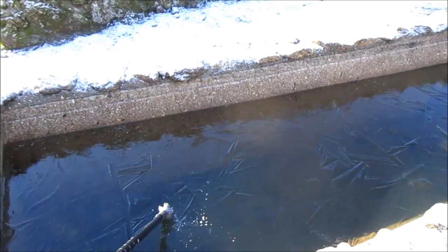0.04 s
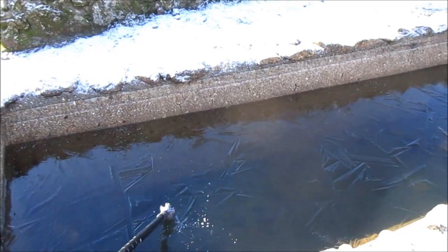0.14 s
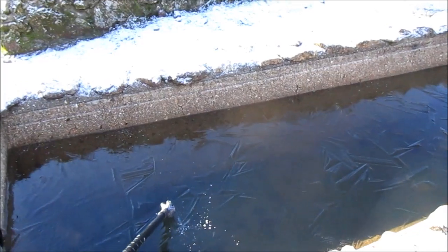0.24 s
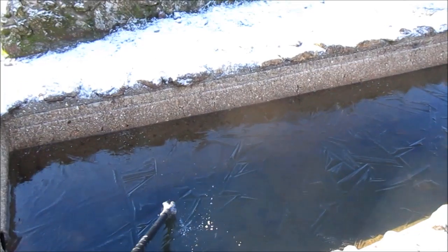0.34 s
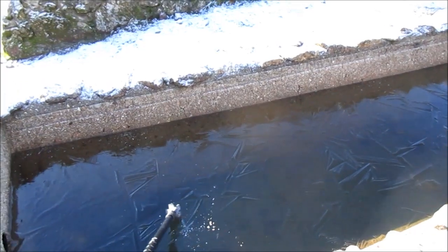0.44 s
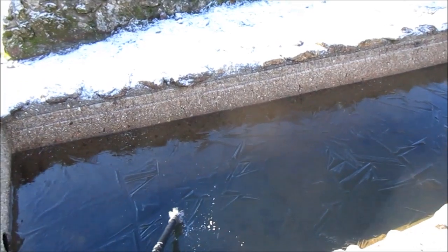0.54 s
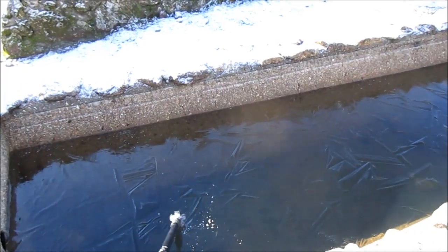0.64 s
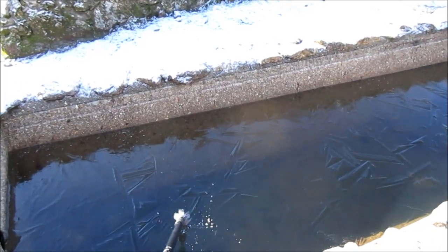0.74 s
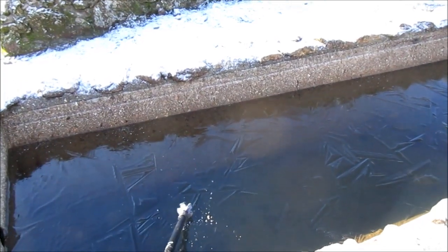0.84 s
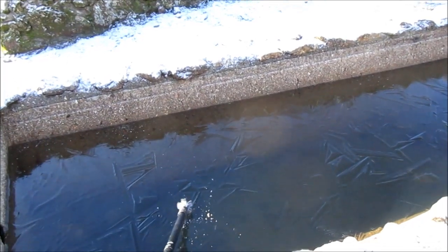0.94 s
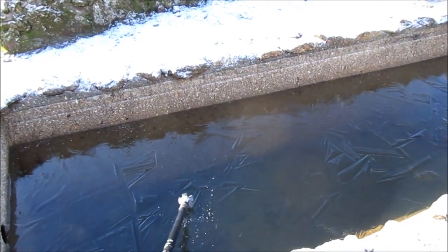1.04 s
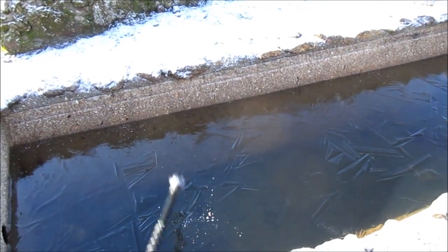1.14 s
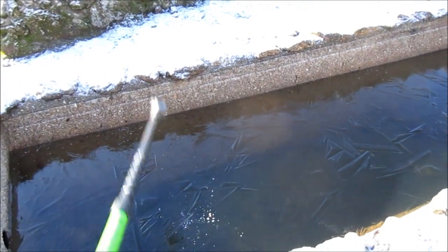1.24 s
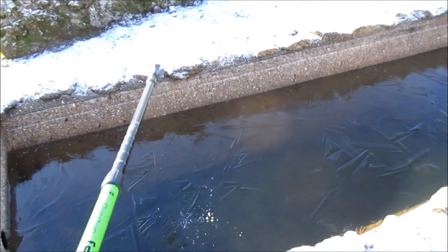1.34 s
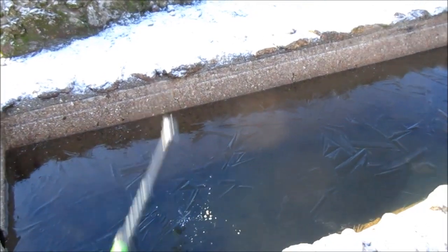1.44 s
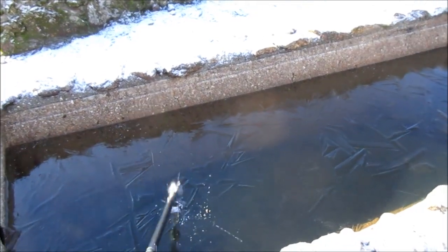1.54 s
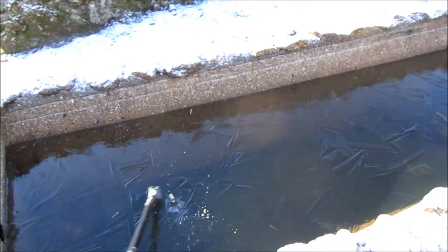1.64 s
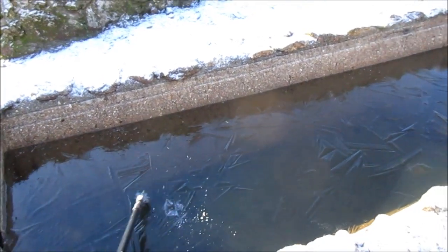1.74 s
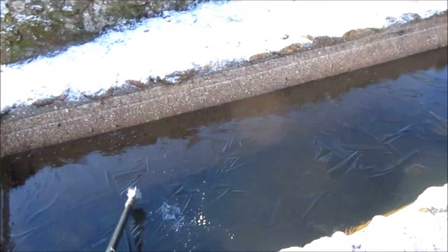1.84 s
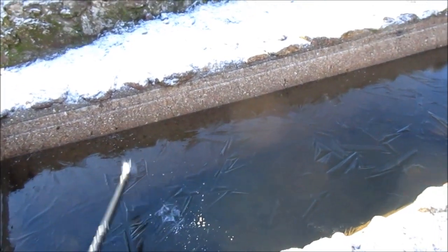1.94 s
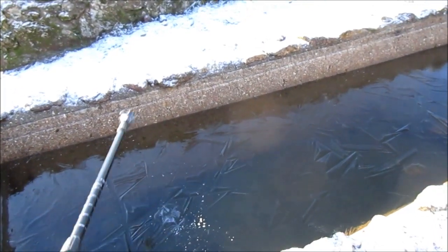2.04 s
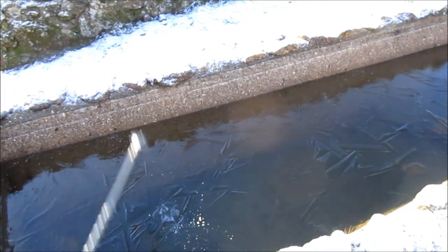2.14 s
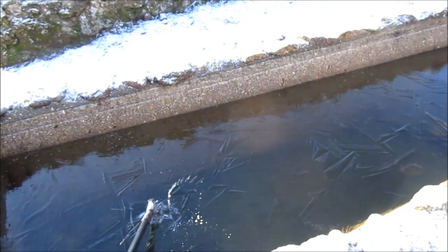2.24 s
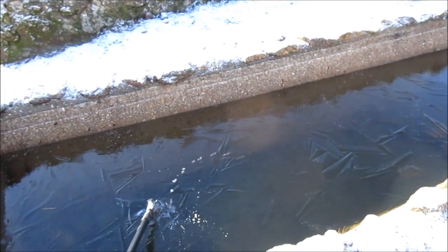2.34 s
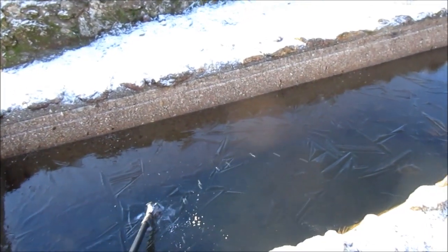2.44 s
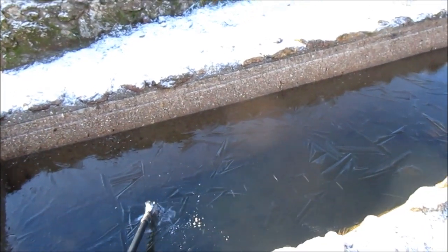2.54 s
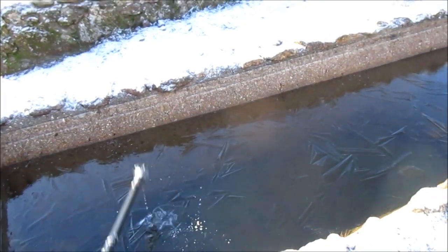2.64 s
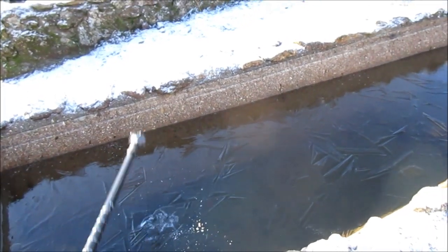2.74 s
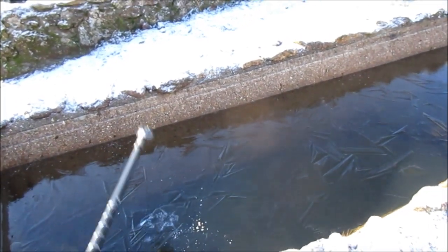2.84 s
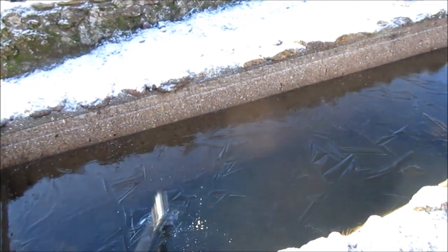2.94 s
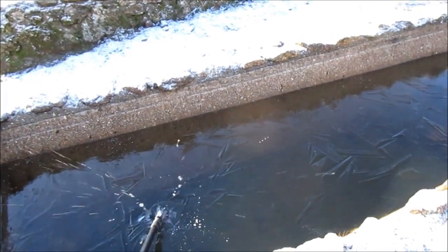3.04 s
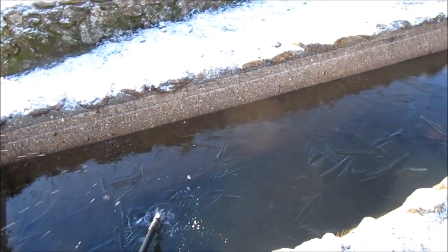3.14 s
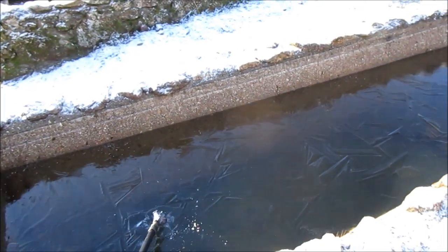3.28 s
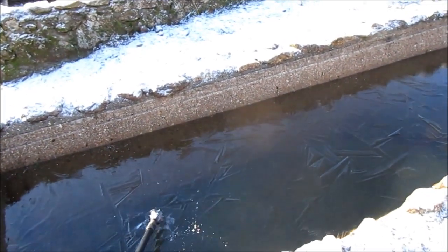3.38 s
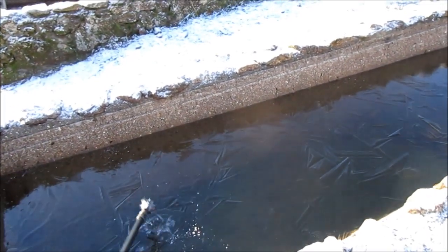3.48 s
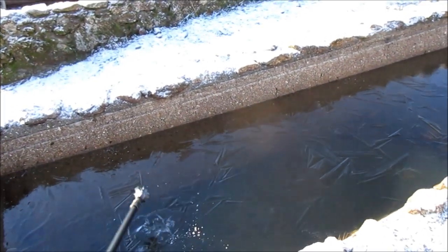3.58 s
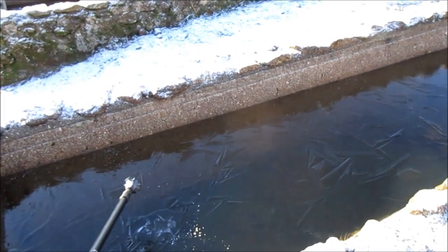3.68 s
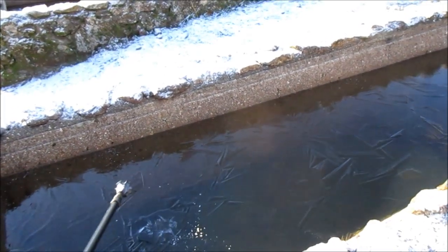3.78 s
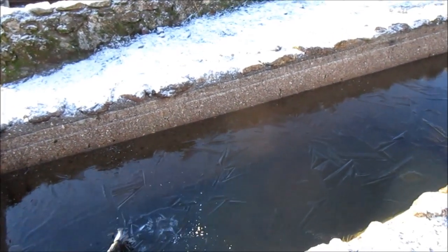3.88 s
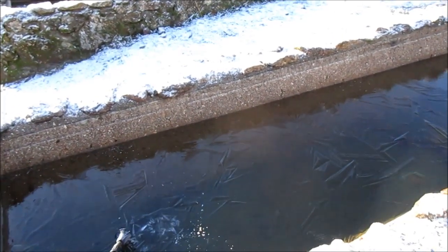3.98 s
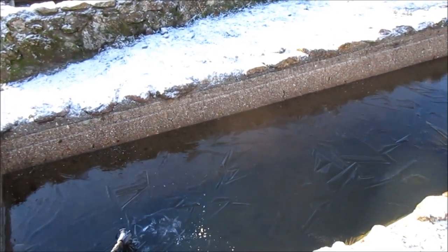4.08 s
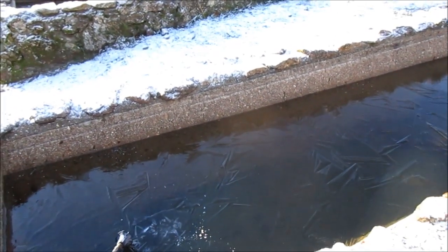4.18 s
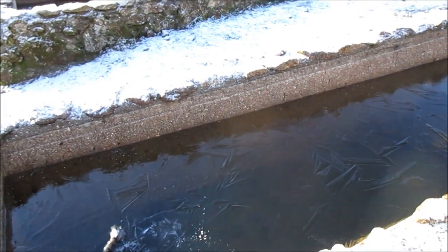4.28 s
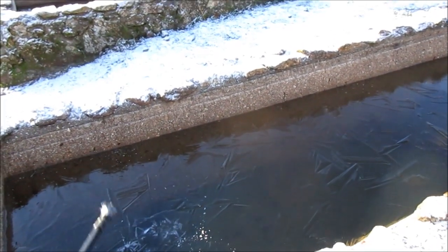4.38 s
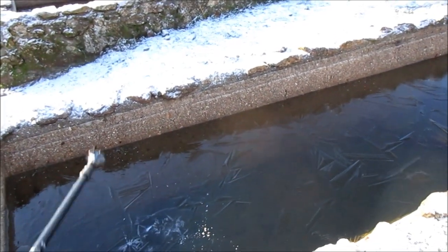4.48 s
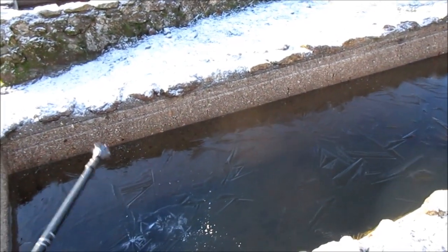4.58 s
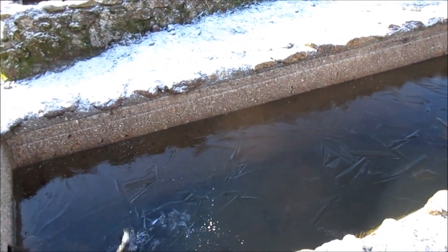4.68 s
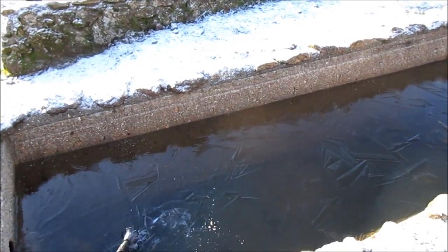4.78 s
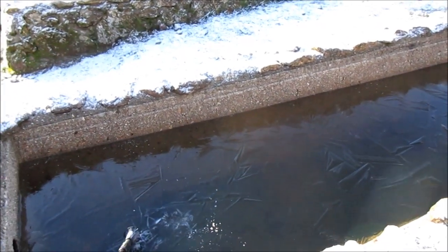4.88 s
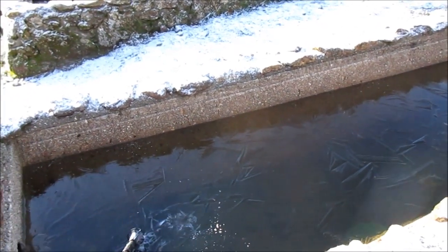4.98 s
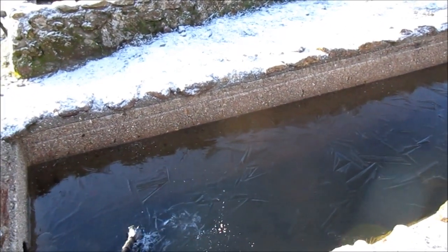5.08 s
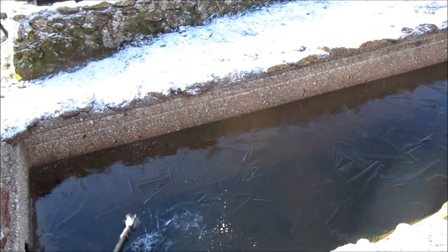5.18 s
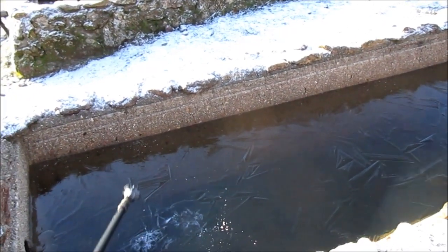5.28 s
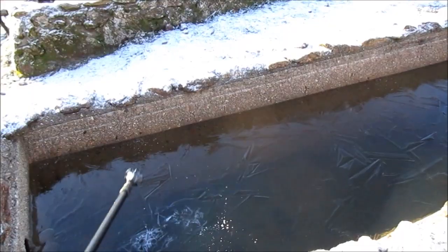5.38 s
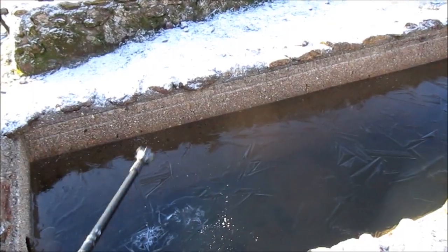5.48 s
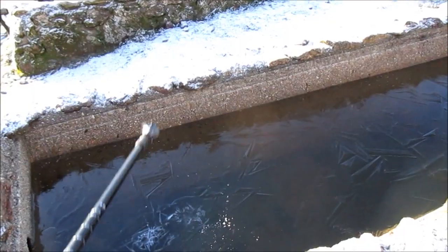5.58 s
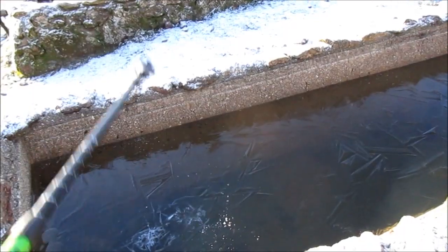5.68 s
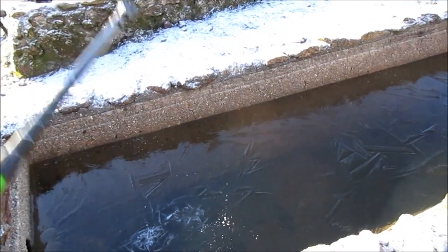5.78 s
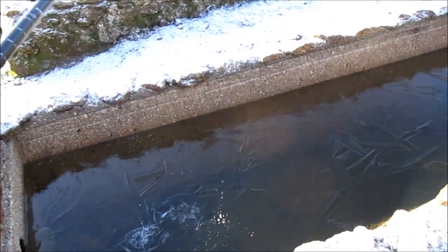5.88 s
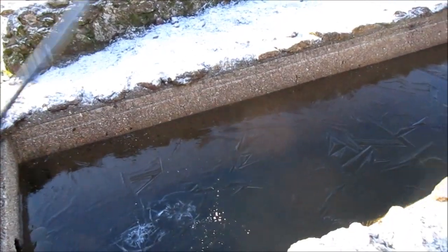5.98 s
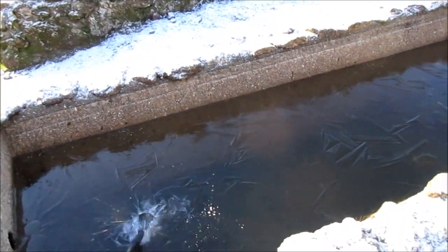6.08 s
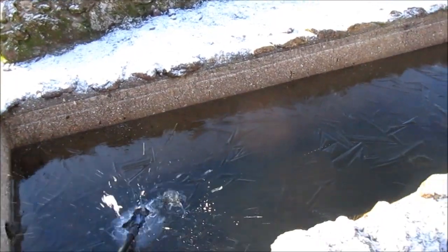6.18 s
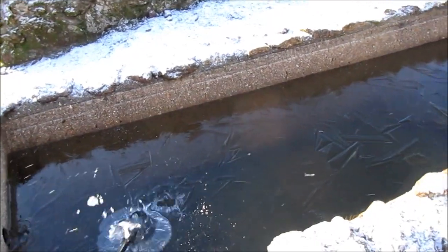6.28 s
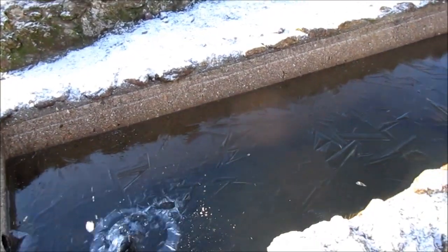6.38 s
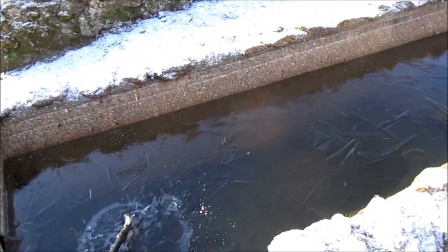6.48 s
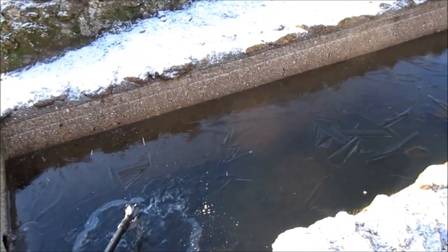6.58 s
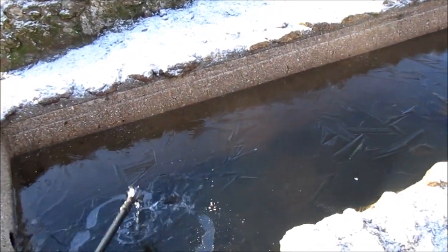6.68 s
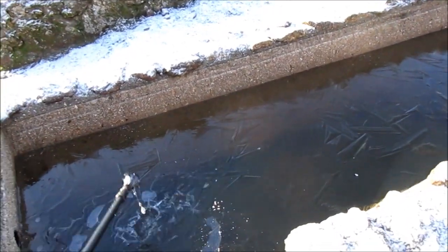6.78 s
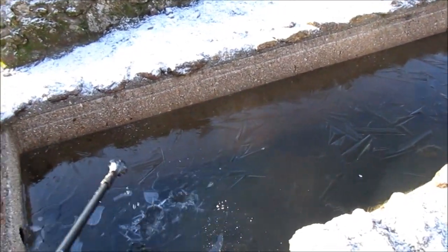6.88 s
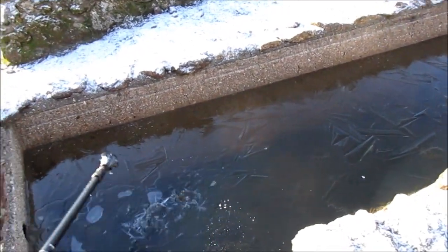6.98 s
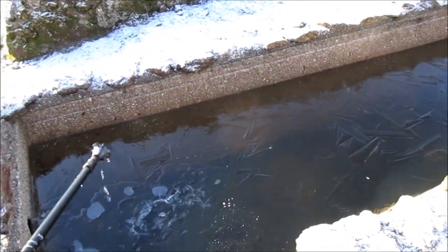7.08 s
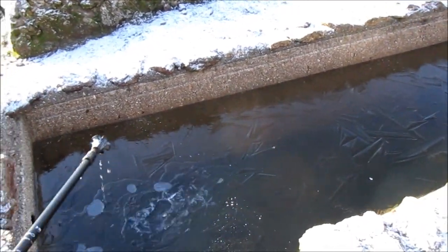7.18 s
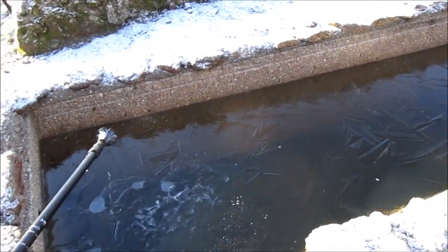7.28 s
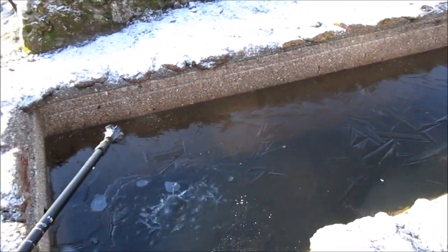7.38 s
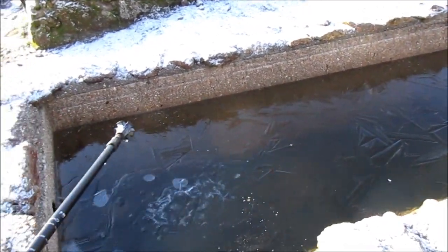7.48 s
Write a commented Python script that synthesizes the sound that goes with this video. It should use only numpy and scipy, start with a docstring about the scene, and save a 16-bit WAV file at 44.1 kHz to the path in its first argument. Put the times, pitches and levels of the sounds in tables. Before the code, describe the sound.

A quiet outdoor place, close mono microphone: light lumpy wind, distant hum, hiss, a very thin high whine and faint intermittent pips. The weak tail of an earlier jab fades at 0 s while clothing rustles, swelling near 1 s, with a few tiny ticks. At 1.5 s a pole tip hits thin ice: a sharp bright crack, short thud, flexing knock and brief hollow boom between walls. More jabs crack at 2.2, 3.0, 3.9 and 4.7 s, each instant and loud, followed by rattling, secondary snaps and sparse fading ticks. Barely audible rising bird notes come near 2.1, 2.9 and 5.3 s. After a quieter pause with slight cloth movement, the sixth jab at 6.1 s breaks through: a heavy crack, then dense splintering, tinkling shards, sloshing and short low glugs until about 7 s. Last isolated ticks and faint rustle fade by 7.5 s.

```python
"""Six sharp stabs of a pole tip crack thin ice on a walled water channel, until the sheet breaks through.
One more stab, just before the start, is still dying away. Each thuds, flexes and rattles the plate and
makes the channel boom: damped sines and shaped noise. Cracks and shard ticks are bursts of tiny clicks;
water gurgles through gliding tones and filtered noise. Clothing rustles at first; light wind, far hum,
a far bird, thin tones and microphone hiss lie below."""
import sys
import numpy as np
from scipy import signal
from scipy.fft import rfft, irfft, next_fast_len
from scipy.io import wavfile

SR = 44100
rng = np.random.default_rng(int(sys.argv[2]) if len(sys.argv) > 2 else 0)


def int16_out(signal):
    """Quantize to a 16-bit WAV file."""
    q = np.round(np.clip(np.atleast_2d(signal).T, -1, 1) * 32767)
    wavfile.write(sys.argv[1], SR, q.astype(np.int16))


N = 331632  # length of the scene in samples

# Stabs of the pole: (time [s], thud level [dB], thud pitch [Hz], flex level [dB], flex pitch [Hz],
# boom level [dB], boom tilt [dB per octave], rattle level [dB], crackle level [dB], rattle t60 [s])
# A t60 is the time a sound takes to fall by 60 dB.
STAB_EVENTS = [(0.0, -35, 380, -62, 950, -46, -4, -53.5, -51.5, 0.45),
               (1.5323, -19, 399, -2, 1137, -38.5, 1.3, -34, -36, 0.36),
               (2.2179, -14, 482, -7, 953, -34, -2.4, -29, -31, 0.3),
               (2.972, -16.5, 294, -24.5, 888, -37.5, -2, -33.5, -31.5, 0.35),
               (3.9164, -8.5, 346, -17, 900, -33.5, -1, -30, -29.5, 0.23),
               (4.712, -16, 344.6, -9, 1039, -36, -4, -33.5, -30.5, 0.32),
               (6.118, -13.5, 291, -9, 799, -35.5, 1.7, -27.5, -18, 0.24)]
# Resonances of air and ice between the walls: (pitch [Hz], level [dB], ring length [relative])
CHANNEL_MODES = [(142.4, -3.5, .7), (233.5, -1, .5), (274, -3, .55), (394, -10, 0.083), (447, -6, 0.61),
                 (539, -7.5, 0.67), (590, -14, 0.37)]
# Tone colour of snapping ice: (frequency [Hz], relative level [dB per Hz])
SNAP_COLOUR = [(3000, -28), (4500, -5.5), (6000, -3), (9000, -4), (11500, -10), (14000, -36.5)]
# Level of the far hum and hiss: (time [s], level [dB])
HUM_LEVEL = [(0, -62), (.33, -58.5), (1.5, -55.5), (1.8, -61), (5.0, -62), (5.2, -63), (5.9, -61.5),
             (6.4, -56), (7.0, -60), (7.52, -61)]


def stabs():
    """The tip thuds and the sheet flexes, as damped sines; the plate then rattles and crackles on."""
    # Duller colour of the sheet's lasting rattle: (frequency [Hz], relative level [dB per Hz])
    shudder_colour = [(400, -15.5), (800, -9), (1300, 1), (2200, -1.5), (3200, -13), (5000, -18)]
    crackle_share = 0.5  # crackle length against rattle length
    linger_db, linger_stretch = -16, 1.8  # a fainter, longer rattle and crackle follow each stab
    out, rattle, crackle = np.zeros((3, N))
    for s, thud_db, thud_hz, flex_db, flex_hz, _, _, rattle_db, crackle_db, t60 in STAB_EVENTS:
        add(out, s, swing(flex_db, flex_hz, 0.0105, 0.0008))
        add(out, s, -swing(thud_db, thud_hz, 0.016, 0.0002))
        add(rattle, s, dying(rattle_db, t60, 0.0099))
        add(rattle, s, dying(rattle_db + linger_db, linger_stretch * t60, 0.01))
        add(crackle, s, dying(crackle_db, crackle_share * t60, 0.0034))
        add(crackle, s, dying(crackle_db + linger_db, linger_stretch * t60, 0.0091))
    clumps = amp(3.5 * drift(60))  # cracks advance in fits
    plate_rattle = coloured(clumps * grit(3000, 1.5), shudder_colour)
    out += rattle * (0.55 * plate_rattle + 0.49 * chips(900, 700, 2800, 5.0))
    plate_crackle = coloured(clumps * grit(5000, 2.7), SNAP_COLOUR)
    out += crackle * (0.64 * plate_crackle + 0.41 * chips(1300, 3700, 13000, 6.6))
    return out


def channel_boom():
    """Each stab makes the channel modes boom: narrow noise that swells and dies."""
    boom_stretch = 3.1  # the boom lasts in step with the rattle
    out = np.zeros(N)
    for hz, mode_db, ring_length in CHANNEL_MODES:
        boom = np.zeros(N)
        for s, *_, boom_db, tilt_db, _, _, rattle_t60 in STAB_EVENTS:
            db = boom_db + mode_db + tilt_db * np.log2(hz / 280)
            t60 = boom_stretch * rattle_t60 * ring_length
            add(boom, s, dying(db, t60, 3.2 / hz))  # low modes build up later
        out += boom * narrow(hz, 5 + 0.2 * hz, rng.standard_normal(N))
    return out


def cracks():
    """A crack snaps in the treble, bends the plate for a few cycles and pushes the water."""
    # Cracks and shard ticks: (time [s], snap peak level [dB], snap pitch [Hz], sizzle level [dB],
    # knock level [dB], knock pitch [Hz], snap t60 [s], knock t60 [s])
    crack_events = [(0.1512, -41, 6900, -64, -45, 1490, 0.024, 0.041),
                    (0.6164, -36.5, 6680, -59, -52, 1430, 0.033, 0.047),
                    (1.068, -38, 6990, -63, -55, 2120, 0.031, 0.04),
                    (1.5321, -1, 9000, -9, -5.5, 1356, 0.024, 0.025),
                    (1.5443, -14, 5860, -35, -37, 3540, 0.019, 0.045),
                    (1.5523, -42, 5660, -45, -28.5, 1620, 0.024, 0.052),
                    (1.6574, -30, 9700, -54, -23.5, 1570, 0.024, 0.028),
                    (1.7254, -44.5, 9970, -65, -55, 1360, 0.027, 0.053),
                    (1.7733, -45, 6440, -66, -70, 3200, 0.024, 0.037),
                    (1.8417, -48.5, 7230, -66, -68, 1480, 0.024, 0.04),
                    (1.9786, -43.5, 7900, -67, -59.5, 1010, 0.022, 0.032),
                    (2.046, -49, 7920, -75, -62, 2640, 0.027, 0.031),
                    (2.22, -3, 7200, -6, -6, 1700, 0.03, 0.022),
                    (2.257, -35, 8130, -35, -26, 2540, 0.013, 0.025),
                    (2.275, -10, 8700, -21, -19.5, 1600, 0.022, 0.036),
                    (2.3034, -29, 9060, -41, -45, 1940, 0.031, 0.04),
                    (2.3107, -31, 8900, -34, -41, 1530, 0.035, 0.052),
                    (2.357, -36, 6800, -46, -53, 1980, 0.033, 0.04),
                    (2.4738, -40.5, 8790, -52, -66.5, 1520, 0.025, 0.036),
                    (2.5511, -42, 6480, -63.5, -65.5, 1756, 0.024, 0.04),
                    (2.9722, -1.5, 6930, -12, -15, 1820, 0.024, 0.032),
                    (2.9942, -26.5, 6100, -34, -26, 1470, 0.024, 0.055),
                    (3.0239, -11, 8400, -28, -22.5, 2180, 0.026, 0.052),
                    (3.0396, -16, 6040, -28, -24, 2670, 0.027, 0.069),
                    (3.0939, -38, 9680, -42, -56, 1620, 0.029, 0.04),
                    (3.3144, -49.5, 7620, -53, -61, 1030, 0.029, 0.037),
                    (3.3224, -48, 8900, -52, -55, 1585, 0.024, 0.045),
                    (3.3304, -45, 6260, -53, -64, 2450, 0.025, 0.04),
                    (3.3415, -45.5, 7790, -55, -53, 1455, 0.028, 0.057),
                    (3.4244, -58, 7850, -75, -59.5, 2800, 0.024, 0.042),
                    (3.916, -2.5, 9300, -10, -9, 1550, 0.021, 0.016),
                    (3.925, -15, 9380, -35, -40.5, 1770, 0.023, 0.031),
                    (3.9332, -21.5, 6340, -40.5, -32.5, 2130, 0.02, 0.04),
                    (3.9494, -29, 7160, -47, -29.5, 2100, 0.026, 0.041),
                    (4.1375, -49.5, 7040, -74, -69.5, 1614, 0.024, 0.038),
                    (4.7121, 2, 6120, -11, -10.5, 2110, 0.016, 0.023),
                    (4.7317, -21, 6040, -54, -30.5, 1560, 0.018, 0.053),
                    (4.751, -31, 5990, -40.5, -35, 2120, 0.019, 0.028),
                    (4.7577, -23.5, 8500, -46, -41, 1970, 0.023, 0.028),
                    (4.8981, -26.5, 8000, -41, -52, 2780, 0.038, 0.055),
                    (4.937, -32, 8100, -46, -57.5, 2580, 0.03, 0.056),
                    (4.9786, -44.5, 5740, -67, -62, 1250, 0.027, 0.04),
                    (5.0953, -46, 7850, -70.5, -65, 1950, 0.028, 0.038),
                    (5.1801, -47.5, 7860, -70, -67.5, 912, 0.022, 0.04),
                    (5.2654, -56.5, 7880, -77, -54, 975, 0.022, 0.038),
                    (6.118, -2.5, 9000, -18, -8.5, 1263, 0.048, 0.043),
                    (6.1467, -12, 8250, -35, -23.5, 2500, 0.017, 0.052),
                    (6.164, -19, 7990, -38, -44, 2110, 0.024, 0.036),
                    (6.1709, -14.5, 7910, -39, -32, 2400, 0.027, 0.035),
                    (6.1814, -20, 7180, -40, -54, 1680, 0.017, 0.04),
                    (6.191, -30, 6210, -39, -54, 1880, 0.013, 0.04),
                    (6.2195, -13, 7960, -30, -34.5, 4090, 0.033, 0.067),
                    (6.2278, -18, 7170, -44, -38.5, 2590, 0.02, 0.073),
                    (6.245, -23, 7050, -43, -43, 2030, 0.04, 0.073),
                    (6.2585, -21, 6600, -42, -43, 2260, 0.046, 0.12),
                    (6.2758, -21.5, 9290, -39, -43, 1800, 0.036, 0.04),
                    (6.2874, -19, 6100, -43, -44.5, 1290, 0.018, 0.084),
                    (6.32, -30.5, 7150, -54, -54, 1340, 0.037, 0.062),
                    (6.3394, -31, 6160, -58, -51, 2150, 0.021, 0.044),
                    (6.3857, -25, 7340, -43, -50, 3890, 0.024, 0.056),
                    (6.3939, -24, 7140, -38, -45, 1720, 0.027, 0.093),
                    (6.445, -41, 7700, -41, -39, 1610, 0.027, 0.068),
                    (6.4614, -37, 9100, -46, -46, 1600, 0.024, 0.04),
                    (6.5068, -17.5, 6760, -41, -43, 2000, 0.022, 0.052),
                    (6.5179, -27, 6400, -49, -42, 1060, 0.022, 0.052),
                    (6.555, -37, 8800, -49, -53, 1220, 0.037, 0.04),
                    (6.5788, -27, 7540, -38, -46.5, 1960, 0.034, 0.031),
                    (6.6453, -44, 7480, -65, -71, 1450, 0.021, 0.04),
                    (6.707, -37, 5970, -57, -50, 1110, 0.024, 0.04),
                    (6.7177, -40, 6040, -53, -51, 1480, 0.022, 0.032),
                    (6.7479, -23.5, 6100, -35, -48, 4260, 0.02, 0.048),
                    (6.7614, -35, 6710, -55, -50, 1820, 0.028, 0.043),
                    (6.7895, -34, 6800, -50, -58, 2490, 0.029, 0.04),
                    (6.8044, -22.5, 8000, -47, -54, 2530, 0.022, 0.064),
                    (6.8115, -28.5, 6790, -43, -52.5, 2550, 0.024, 0.087),
                    (6.8586, -32.5, 8940, -40, -59, 2030, 0.022, 0.04),
                    (6.896, -38.5, 5800, -62, -64, 2650, 0.026, 0.04),
                    (6.91, -50, 5670, -56, -51, 2540, 0.024, 0.052),
                    (6.9457, -27.5, 8630, -37, -57, 4200, 0.02, 0.04),
                    (6.951, -32.5, 7090, -49, -54, 1620, 0.028, 0.072),
                    (7.0048, -44, 10070, -48, -64, 1340, 0.024, 0.04),
                    (7.0183, -39, 8650, -63, -57, 1060, 0.02, 0.04),
                    (7.2528, -31.5, 6550, -59, -57, 3510, 0.024, 0.053),
                    (7.434, -40, 6400, -76, -59, 1550, 0.024, 0.038)]
    # Colour of the finest splits: (frequency [Hz], relative level [dB per Hz])
    sizzle_colour = [(8000, -34.5), (11000, 0), (13500, 2), (16000, -12)]
    # Colour of the knocking plate: (frequency [Hz], relative level [dB per Hz])
    knock_colour = [(400, -14.5), (800, -17.5), (1300, -3), (2400, 3), (4000, -5.5), (6000, -19.5)]
    # Dull bumps without a snap: (time [s], peak level [dB])
    bump_events = [(0.152, -46), (0.775, -45.5), (1.393, -45.5), (1.577, -47), (1.596, -38), (3.425, -49.5),
                   (5.264, -47.5), (7.021, -46.5)]
    crest_db = 10  # how far a snap's peak stands above its envelope
    tail_db, tail_stretch = -13.5, 3  # smaller splits follow, fainter and longer
    snap_rise_s, thump_below_knock_db = 0.0006, -13
    out, splitting = np.zeros(N), grit(15000, 5.4)
    # every source is repeated, so that late bursts do not run out of sound
    splits = np.tile(coloured(splitting, SNAP_COLOUR), 2)
    fine_splits = np.tile(coloured(splitting, sizzle_colour), 2)
    plate = np.tile(coloured(grit(5400, 4.0), knock_colour), 2)
    low = np.tile(narrow(380, 190, rng.standard_normal(N)), 2)
    for s, snap_db, snap_hz, sizzle_db, knock_db, knock_hz, t60, knock_t60 in crack_events:
        shape = dying(snap_db - crest_db + tail_db, t60 * tail_stretch, snap_rise_s)
        add(shape, 0, dying(snap_db - crest_db, t60, snap_rise_s))
        snap = burst(shape, splits, s)
        add(out, s, 0.96 * snap + 1.3 * resonance(snap, snap_hz, 590))  # the shard's size colours its snap
        add(out, s, burst(dying(sizzle_db, 0.45 * t60, snap_rise_s), fine_splits, s))
        knock = burst(dying(knock_db, knock_t60, 0.0005), plate, s)
        add(out, s, 0.91 * knock + 0.26 * resonance(knock, knock_hz, 500))
        add(out, s, 3.8 * swing(knock_db, knock_hz, 0.23 * knock_t60, 0.00059))
        add(out, s, burst(dying(knock_db + thump_below_knock_db, 0.024, 0.0006), low, s))
    for s, db in bump_events:
        add(out, s, burst(dying(db, 0.035, 0.00045), low, s))
    return out


def splinters():
    """Dense splintering as the sheet gives way: a spray of tiny ringing chips, uneven in level."""
    # Loudness of the spray: (time [s], level [dB])
    spray_level = [(6.12, -59), (6.164, -68), (6.292, -57), (6.366, -59.5), (6.494, -55), (6.776, -70),
                   (6.95, -65), (7.05, -78)]
    return level(spray_level, 1) * amp(2.1 * drift(56)) * chips(2500, 4380, 11900, 6.0)


def stirred_water():
    """Water sloshing through the hole excites the channel modes; small bubbles ring in it."""
    # Loudness of the sloshing: (time [s], level [dB])
    slosh_level = [(6.14, -51), (6.19, -52), (6.246, -48), (6.28, -48), (6.37, -56.5), (6.53, -47.5),
                   (6.6, -51.5), (6.74, -59.5), (6.82, -52), (6.92, -68), (7.0, -57.5), (7.1, -72)]
    stirred = rng.standard_normal(N) * amp(3 * drift(25))
    slosh = rms_one(sum(amp(db) * narrow(hz, 44, stirred) for hz, db, _ in CHANNEL_MODES))
    bubbles = amp(-11.5) * chips(360, 200, 2200, 4.6)
    return level(slosh_level, 1) * (slosh + bubbles)


def air_pockets():
    """Air pockets under the broken ice glug: short gliding tones, wavering in pitch and level."""
    # Glugs: (time [s], length [s], start pitch [Hz], end pitch [Hz], level [dB])
    glug_events = [(6.255, 0.058, 550, 397, -31), (6.266, 0.0564, 1437, 1165, -42),
                   (6.4, 0.025, 270, 220, -43), (6.475, 0.019, 1550, 1500, -46.5),
                   (6.451, 0.012, 790, 1030, -38.5), (6.458, 0.018, 1110, 1200, -40),
                   (6.522, 0.021, 305, 420, -41.5), (6.568, 0.016, 293, 242, -32.5),
                   (6.613, 0.1, 282, 218, -54), (6.223, 0.011, 633, 710, -35),
                   (6.71, 0.011, 1150, 1040, -48)]
    pockets, wobble = np.zeros(N), 0.015 * drift(70)  # wobble as a share of the pitch
    for s, *tone in glug_events:
        add(pockets, s, glide(*tone, wobble[round(s * SR):]))
    return pockets * amp(1.5 * drift(55))


def cloth():
    """Clothing rustles: dense uneven clicks, coloured and swelling irregularly."""
    # Three stretches of moving cloth, each a curve: (time [s], level [dB])
    rustle_levels = [
        [(0, -60), (.1, -63), (.3, -60.5), (.7, -63), (.88, -53), (.98, -54), (1.04, -53.5), (1.08, -50.5),
         (1.115, -67.5), (1.52, -60.5)],
        [(5.2, -81), (5.45, -67.5), (5.9, -81), (6.11, -56)],
        [(6.95, -67), (7.2, -67.5), (7.3, -78)],
    ]
    # Colour of the cloth: (frequency [Hz], relative level [dB per Hz])
    cloth_colour = [(180, -37), (400, -1.5), (900, -11), (1500, 5), (2300, 1), (3900, -7.5), (4750, -15.5),
                    (6000, -3), (7500, -2.5), (13000, -17), (16000, -31)]
    rubbing = grit(9000, 0.83) * amp(1.5 * drift(30))
    return sum(level(rows, 1) for rows in rustle_levels) * coloured(rubbing, cloth_colour)


def wind():
    """Light, lumpy wind: low noise with a soft peak, wandering slowly in level."""
    # Loudness of the wind: (time [s], level [dB])
    wind_level = [(0.0, -56.5), (1.46, -58), (1.82, -64), (3.22, -63), (3.62, -68), (4.9, -64),
                  (5.19, -64.5), (6.01, -69.5), (6.99, -66), (7.52, -68.5)]
    low_band = signal.butter(2, [24, 115], "band", fs=SR, output="sos")
    gusts = rms_one(signal.sosfilt(low_band, rng.standard_normal(N)))
    gusts = gusts + 0.88 * narrow(68, 22, rng.standard_normal(N))
    return level(wind_level, 1) * rms_one(gusts * amp(1.1 * drift(4.7)))


def bird():
    """A far bird's rising notes: short sines that slide upwards."""
    # Notes: (time [s], length [s], start pitch [Hz], end pitch [Hz], level [dB])
    bird_notes = [(2.05, .06, 2600, 2760, -67), (2.86, .05, 2680, 2780, -68), (5.32, .06, 2720, 2800, -72)]
    out = np.zeros(N)
    for s, *tone in bird_notes:
        add(out, s, glide(*tone))
    return out


def hum_and_hiss():
    """Far hum and microphone hiss: one coloured noise under a slow level curve."""
    # Colour of hum and hiss: (frequency [Hz], relative level [dB per Hz])
    hum_colour = [(59, -30.5), (100, -3), (302, -5), (705, -19.5), (991, -12.5), (1100, -16.5), (1280, -16),
                  (3780, -22.5), (4770, -28), (5420, -24.5), (7770, -22), (13500, -31), (16000, -41.5)]
    return level(HUM_LEVEL, 1) * coloured(rng.standard_normal(N), hum_colour)


def thin_tones():
    """A high whine wavers a little in pitch; a faint lower sine comes and goes."""
    # Pips of the lower tone: (time [s], length [s])
    pip_times = [(.05, .06), (.21, .05), (.31, .05), (.45, .03), (.535, .06), (.69, .03), (.79, .05),
                 (.95, .05), (1.11, .05), (1.25, .035), (1.33, .03), (1.41, .03), (1.495, .035),
                 (1.77, .03), (1.89, .03), (2.89, .03), (3.22, .05), (3.48, .04), (3.61, .03), (3.69, .03),
                 (3.77, .07), (4.11, .04), (4.26, .02), (4.34, .05), (4.495, .025), (4.59, .045)]
    pip_hz, pip_db = 3205, -11  # level against the far hum
    whine_hz, whine_width_hz, whine_db = 7855, 15, -78
    whine_pitch = whine_hz + whine_width_hz * drift(30)
    whine = amp(whine_db) * np.sqrt(2) * np.sin(2 * np.pi * np.cumsum(whine_pitch) / SR)
    pips = np.zeros(N)
    for s, length in pip_times:
        t = np.arange(int(length * SR) + 8)
        fade = signal.windows.tukey(len(t), 0.4)
        add(pips, s, np.sqrt(2) * fade * np.sin(2 * np.pi * pip_hz * t / SR))
    return whine + amp(pip_db) * level(HUM_LEVEL, 1) * pips


def amp(db):
    """Turns decibels into a gain."""
    return 10 ** (np.asarray(db) / 20)


def rms_one(x):
    """Scales x to an average strength (rms) of 1."""
    return x / np.sqrt(np.mean(x ** 2) + 1e-20)


def level(rows, column):
    """Gain along a curve of decibels, silent outside it."""
    rows = np.array(rows)
    return amp(np.interp(np.arange(N) / SR, rows[:, 0], rows[:, column], left=-200, right=-200))


def coloured(x, spectrum):
    """Shapes x by a spectrum without smearing it ahead in time (minimum phase); rms 1."""
    size = next_fast_len(N + 4096)
    hz, db = np.transpose(spectrum)
    bins_hz = np.arange(size // 2 + 1) * SR / size
    log_gain = np.interp(np.log(bins_hz + 1), np.log(hz), db) * np.log(10) / 20
    # folding the cepstrum forwards gives the filter that responds soonest
    cepstrum = irfft(log_gain, size)
    cepstrum[1:size // 2] *= 2
    cepstrum[size // 2 + 1:] = 0
    return rms_one(irfft(rfft(x, size) * np.exp(rfft(cepstrum)), size)[:N])


def drift(rate):
    """Slow random wandering, spread 1; a higher rate wanders faster."""
    r = np.exp(-80 * np.pi * rate / SR)  # computed at every 40th sample
    slow = signal.lfilter([1], [1, -2 * r, r * r], rng.standard_normal(N // 40 + 2002))[2000:]
    return np.interp(np.arange(N) / 40, np.arange(len(slow)), rms_one(slow))


def grit(per_s, spread_db):
    """Random clicks of uneven size and sign."""
    sizes = amp(spread_db * np.minimum(rng.exponential(1, N), 4)) * rng.choice([-1, 1], N)
    return sizes * (rng.random(N) < per_s / SR) + 1e-18


def chips(per_s, low_hz, high_hz, cycles):
    """Random clicks, each ringing a few cycles at one of twelve pitches, as loose ice or bubbles; rms 1."""
    clicks, dealt = grit(per_s, 3.5), rng.integers(0, 12, N)
    out = np.zeros(N)
    for k, hz in enumerate(np.geomspace(low_hz, high_hz, 12)):
        own_clicks = clicks * (dealt == k) + 1e-18
        out += resonance(own_clicks, hz, hz / cycles) * np.sqrt(cycles / hz)
    return rms_one(out)


def resonance(x, hz, width_hz):
    """Two-pole peak of gain 1."""
    r = np.exp(-np.pi * max(width_hz, 1) / SR)
    poles = [1, -2 * r * np.cos(2 * np.pi * hz / SR), r * r]
    return signal.lfilter([(1 - r * r) / 2, 0, (r * r - 1) / 2], poles, x)


def narrow(hz, width_hz, source):
    """A steep resonance, the same peak twice; rms 1."""
    return rms_one(resonance(resonance(source, hz, width_hz), hz, width_hz))


def dying(db, t60, rise_s):
    """Envelope with a short rise and an exponential fall of 60 dB."""
    t60 = max(t60, 0.004)
    t = np.arange(int(t60 * SR) + 8) / SR
    return amp(db - 60 * t / t60) * (1 - np.exp(-t / max(rise_s, 1e-4)))


def swing(db, hz, t60, rise_s):
    """A damped sine, as of a struck plate."""
    shape = dying(db, t60, rise_s)
    return shape * np.sin(2 * np.pi * hz * np.arange(len(shape)) / SR)


def glide(length, start_hz, end_hz, db, wobble=None):
    """A short tone that slides in pitch and may waver."""
    hz = np.linspace(start_hz, end_hz, int(length * SR) + 8)
    shape = np.sin(np.pi * np.linspace(0, 1, len(hz)) ** 0.52)  # swells faster than it fades
    if wobble is not None:
        hz = hz * (1 + wobble[:len(hz)])
    return amp(db) * shape * np.sin(2 * np.pi * np.cumsum(hz) / SR)


def burst(shape, source, s):
    """A stretch of the source under an envelope, holding the envelope's energy."""
    piece = shape * source[round(s * SR):][:len(shape)]
    return piece * np.sqrt(np.sum(shape ** 2) / np.sum(piece ** 2))


def add(out, s, piece):
    """Mixes a piece in from time s."""
    i = max(round(s * SR), 0)
    out[i:i + len(piece)] += piece[:N - i]


def scene():
    """Mixes ice and water with the surroundings, then dips the microphone's treble."""
    ice = stabs() + channel_boom() + cracks() + splinters() + stirred_water() + air_pockets()
    low_cut = signal.butter(2, 88, "high", fs=SR, output="sos")
    ice = signal.sosfilt(low_cut, ice)  # the small sheet radiates no deep bass
    air = ice + cloth() + wind() + bird() + hum_and_hiss() + thin_tones()
    notch_hz, notch_width_hz, notch_share = 4800, 470, 0.97
    heard = air - notch_share * resonance(air, notch_hz, notch_width_hz)  # dip of the microphone housing
    return heard[None]


def record(dry):
    """The loudest peaks overload softly, and the top is cut."""
    x = dry / (1 + np.abs(dry / 0.9) ** 6) ** (1 / 6)
    top_cut = signal.cheby2(20, 70, 16600, fs=SR, output="sos")  # 70 dB down from 16600 Hz up
    return signal.sosfilt(top_cut, x)


dry = scene()
out = record(dry)
int16_out(out)
```